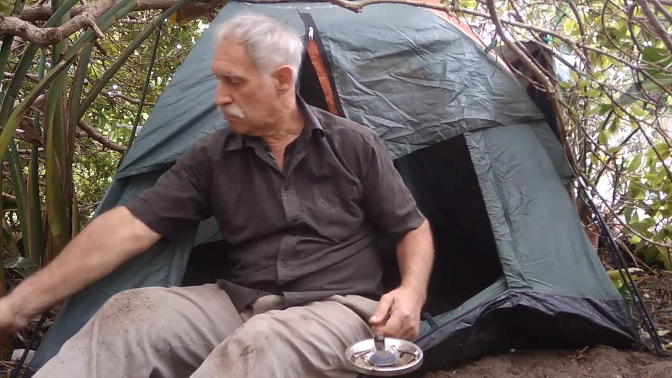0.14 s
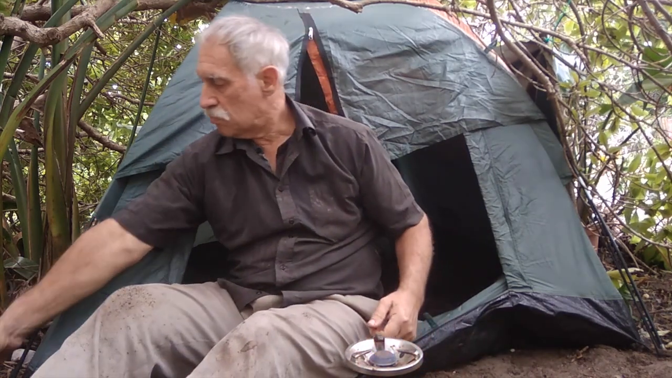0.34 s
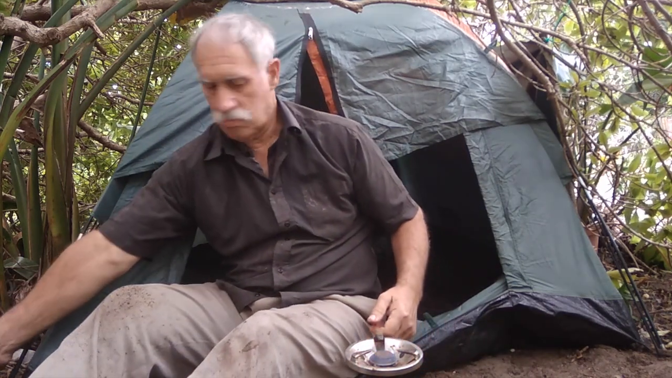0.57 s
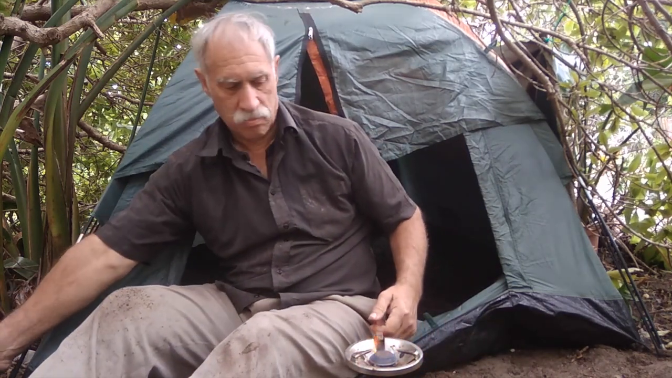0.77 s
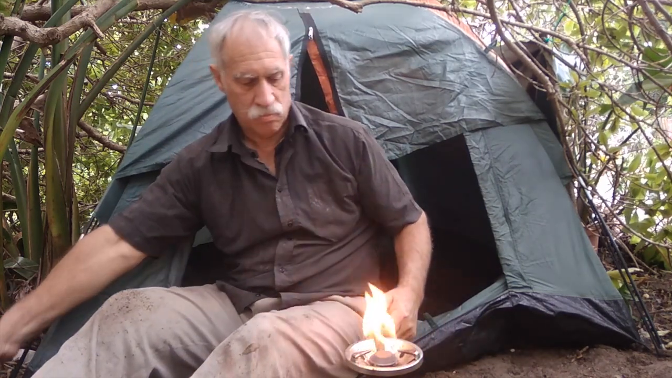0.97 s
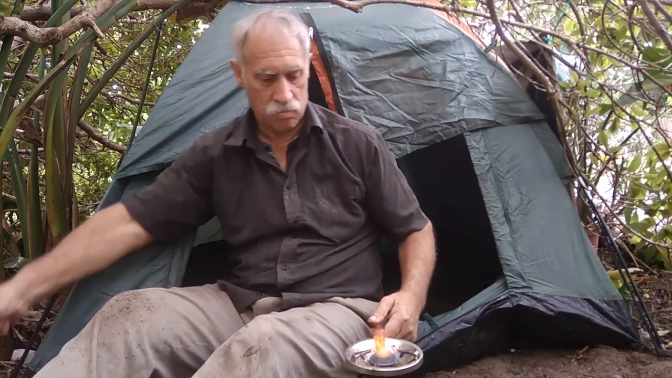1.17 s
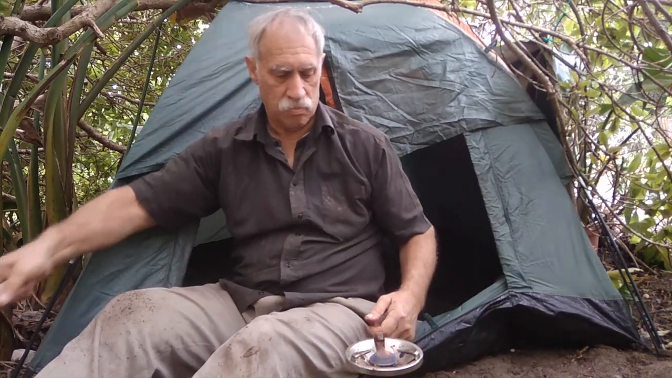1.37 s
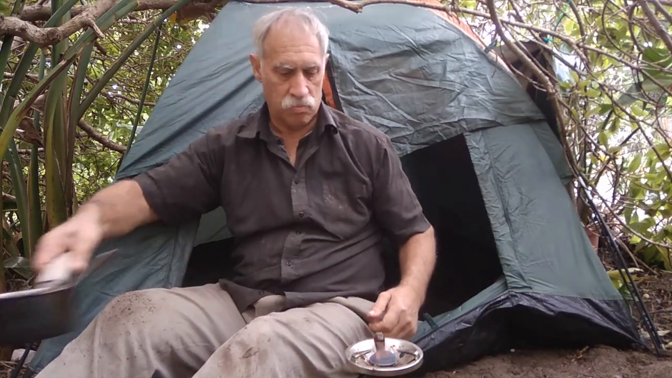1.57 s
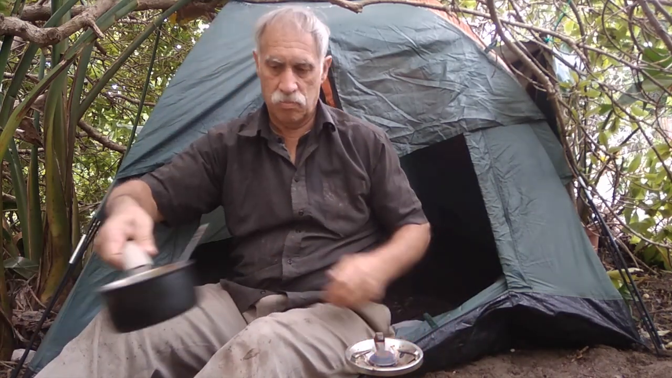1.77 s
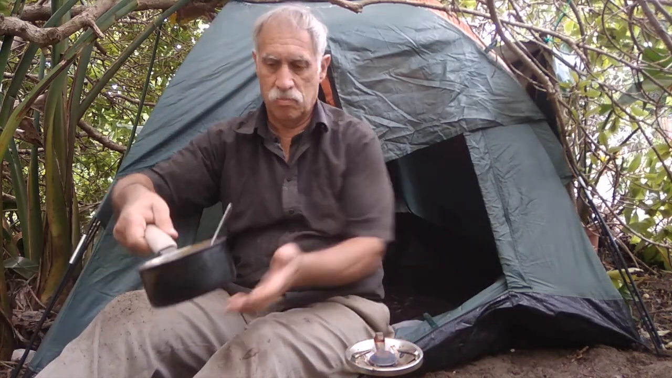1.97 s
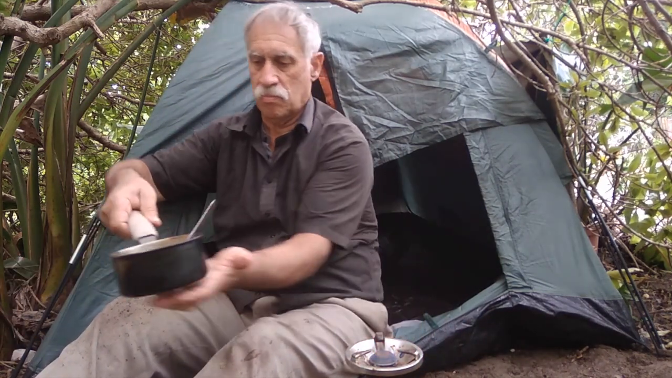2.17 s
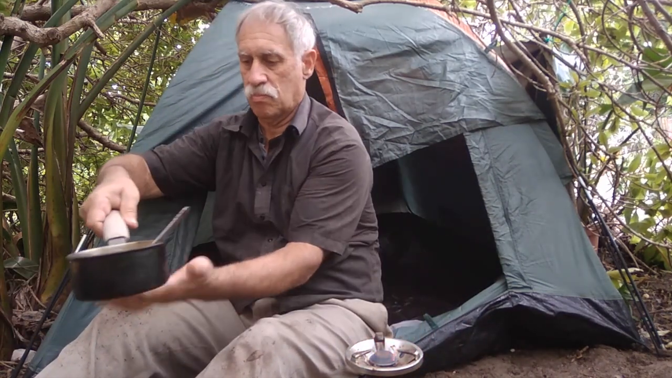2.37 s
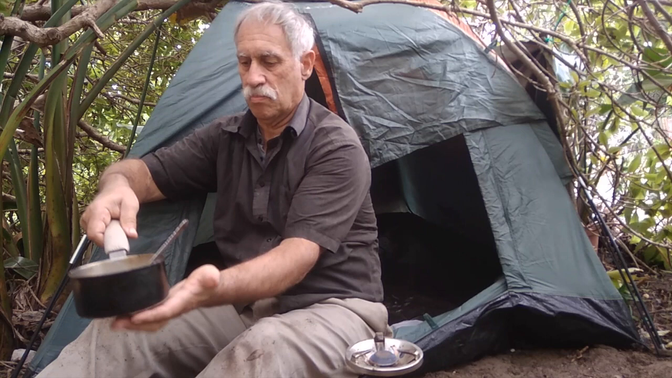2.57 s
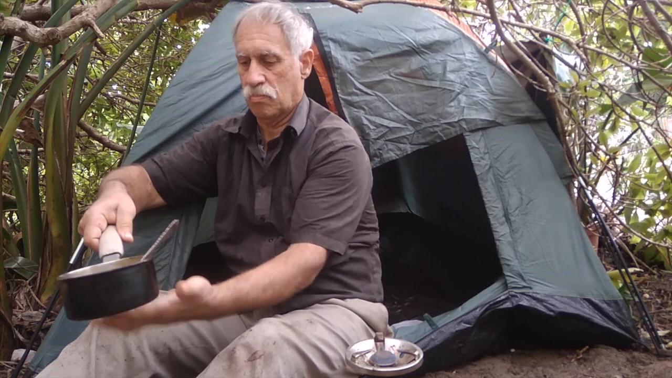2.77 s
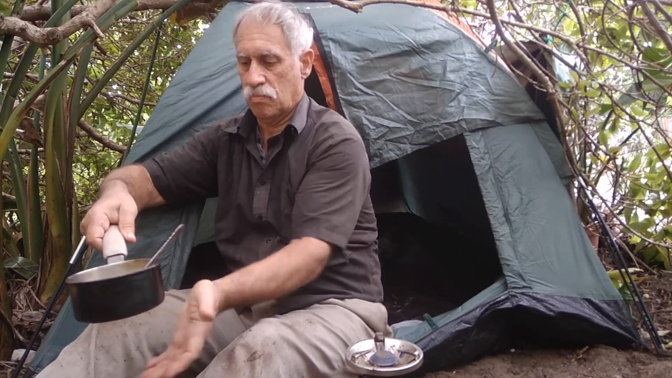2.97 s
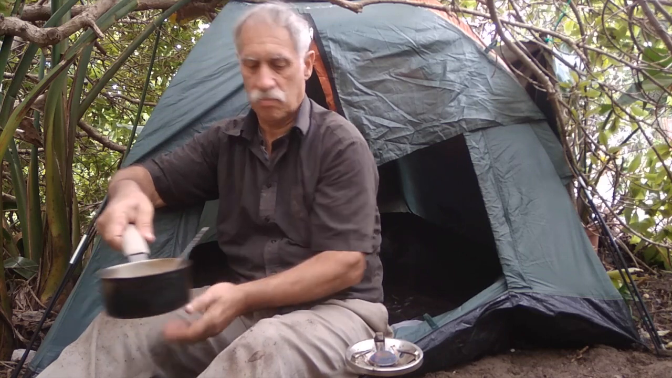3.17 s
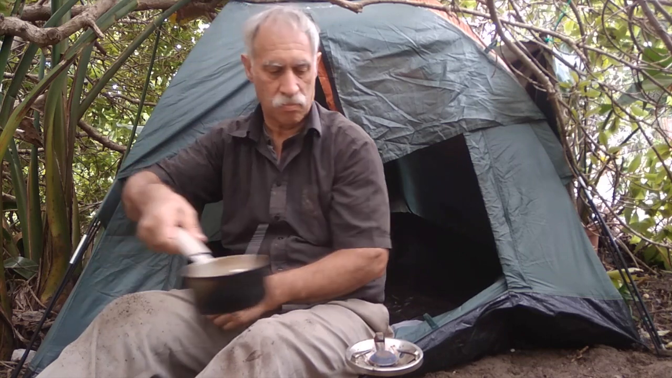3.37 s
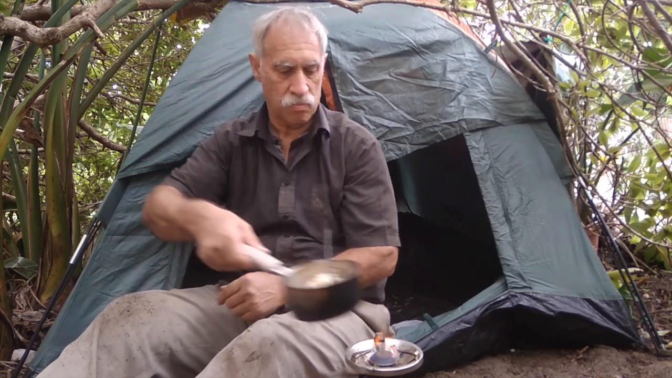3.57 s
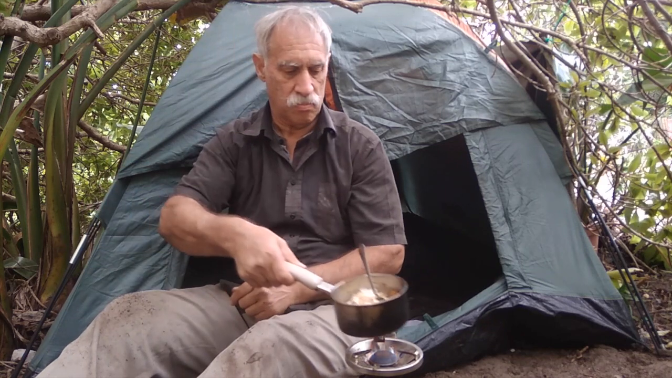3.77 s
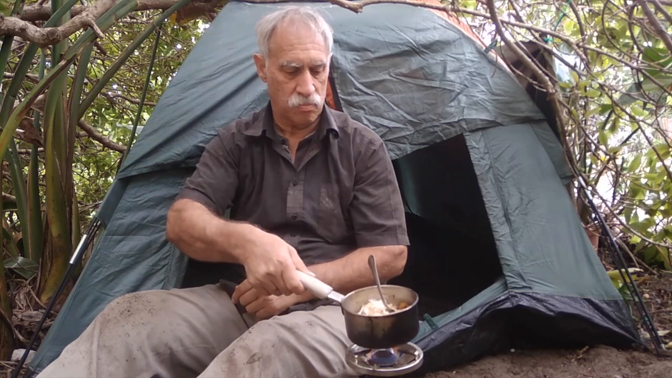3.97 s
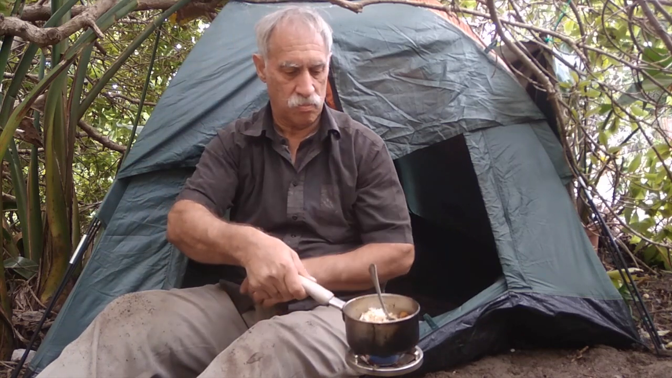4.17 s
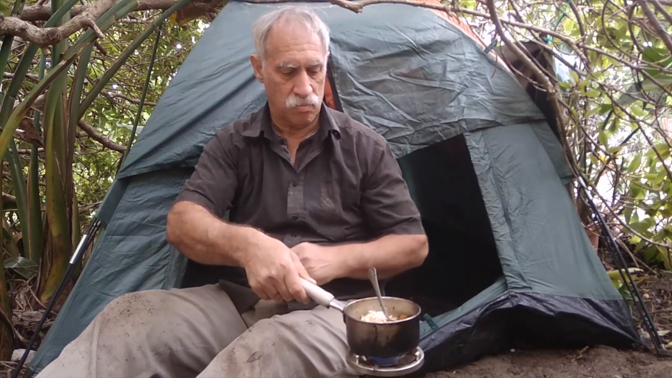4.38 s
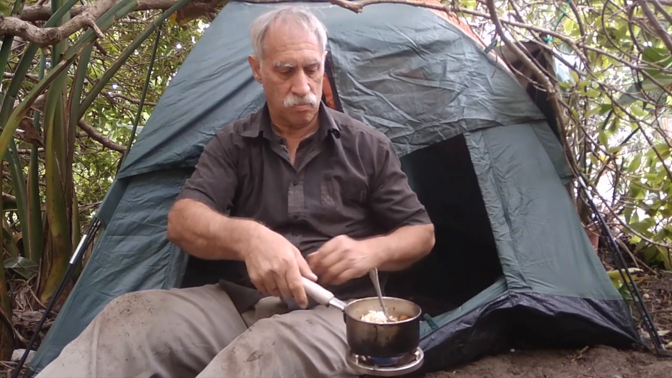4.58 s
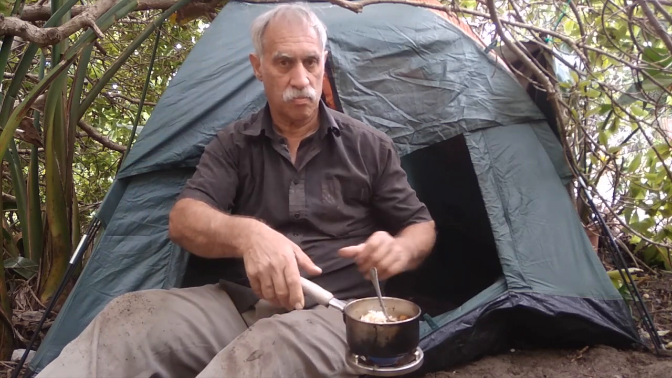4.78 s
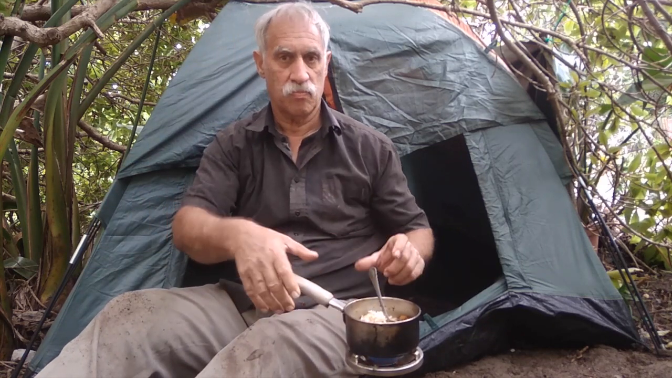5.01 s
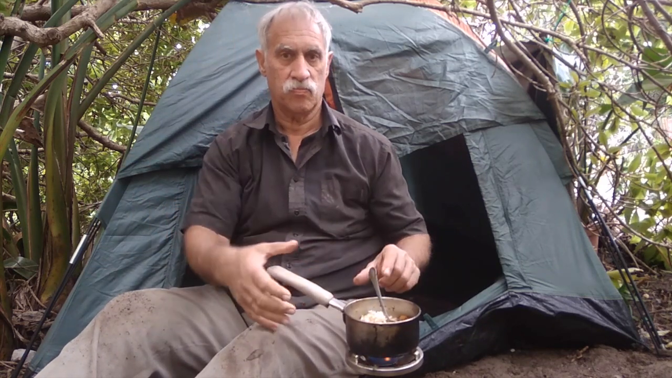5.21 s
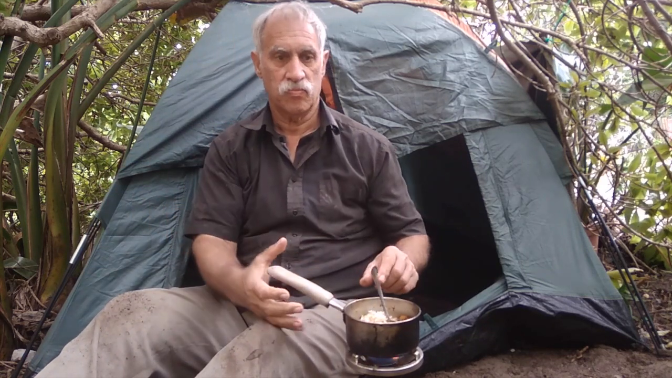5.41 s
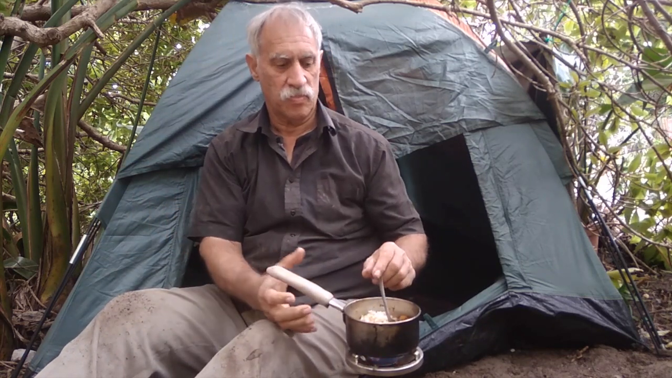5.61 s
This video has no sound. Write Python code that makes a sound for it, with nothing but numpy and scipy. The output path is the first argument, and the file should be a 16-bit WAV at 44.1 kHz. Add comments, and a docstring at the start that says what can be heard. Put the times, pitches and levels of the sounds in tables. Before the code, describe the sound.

Steady burner hiss over a low flame roar, with a brief flare, two scrapes of a palm under a pot, and a metallic clank.

```python
"""A small gas stove burns outdoors: shaped noise hisses in the burner jet and roars softly in the flame.
A bird, swept sines, chirps far off; the flame flares with thumps and puffs, sags once and catches again.
Sleeves rustle and a hand wipes twice under a metal pot, both as swells of grainy noise.
The pot is swung over the flame, which from then on shades the hiss, and is set down on the supports
with a clank of cracks, ringing modes and dense overtones."""
import sys
import numpy as np
from scipy import signal
from scipy.fft import rfft, irfft, next_fast_len
from scipy.io import wavfile
from scipy.ndimage import map_coordinates

SR = 44100
rng = np.random.default_rng(int(sys.argv[2]) if len(sys.argv) > 2 else 0)


def generate_wav(sig):
    """Save sig (samples, or channels by samples) to the path in sys.argv[1] as 16-bit PCM at SR."""
    pcm = np.round(np.clip(np.atleast_2d(sig).T, -1, 1) * 32767).astype(np.int16)
    wavfile.write(sys.argv[1], SR, pcm)


N = 249066
TIME = np.arange(N) / SR   # s
SIZE = next_fast_len(N, real=True)
HZ = np.maximum(np.arange(SIZE // 2 + 1) * SR / SIZE, 1)   # frequency of each spectrum bin

# the flame goes slack and catches on the burner again; each change of level takes SWITCH_S
SLACK_S, CATCH_S, SWITCH_S = 0.865, 0.996, 0.01


def from_db(db):
    """Decibels to gain."""
    return np.exp(np.asarray(db) * np.log(10) / 20)


def over_hz(points):
    """A table of (f/Hz, value) joined on a log-frequency axis."""
    hz, value = np.transpose(points)
    return np.interp(np.log(HZ), np.log(hz), value)


def above(hz):
    """Share of each frequency that lies above a steep crossover."""
    return 1 - 1 / (1 + (HZ / hz) ** 12)


def pan(db):
    """Left and right gains for a level difference; positive leans left."""
    return from_db(np.array([[0.5], [-0.5]]) * db)


def ramp(start_s, length_s):
    """A straight rise from 0 to 1."""
    return np.clip((TIME - start_s) / length_s, 0, 1)


def envelope(strokes):
    """Summed gain of bell-shaped swells, each with its own rise and fall."""
    gain = 0
    for s, db, rise_s, fall_s in strokes:
        spread_s = np.where(TIME < s, rise_s, fall_s)
        gain = gain + from_db(db) * np.exp(-0.5 * ((TIME - s) / spread_s) ** 2)
    return gain


def drift(rate_hz, order=16):
    """Slow chance of spread about 1: low-passed noise drawn on a grid of every 16th sample."""
    count = N // order + 2
    hz = np.arange(count // 2 + 1) * SR / (order * count)
    slow = irfft(rfft(rng.standard_normal(count)) / (1 + (hz / rate_hz) ** 2), count)
    return np.interp(np.arange(N) / order, np.arange(count), slow / slow.std())


def turbulence(right_lag_s=2.4e-5):
    """Spectrum of stereo noise at 0 dB per Hz; the right side hears it later and mostly less alike in the treble."""
    # likeness of the two sides: (f/Hz, left-right correlation)
    likeness = [(30, 0.81), (150, 0.92), (500, 0.98), (900, 0.11), (1500, 0.72), (2500, 0.1), (4500, 0.5),
                (6200, 0.52), (8000, 0.19), (9600, 0.23), (10900, 1), (12200, 0.18), (14000, 0.09)]
    mid, side = rfft(rng.standard_normal((2, SIZE))) * np.sqrt(SR) / 2
    alike = np.clip(over_hz(likeness), 0, 1)
    mid = mid * np.sqrt(1 + alike)
    side = side * np.sqrt(1 - alike)
    lag = np.exp(-2j * np.pi * HZ * right_lag_s)
    return np.array([mid + side, (mid - side) * lag])


def coloured(noise, gain):
    """A noise spectrum through a filter, as a waveform."""
    return irfft(noise * gain, SIZE)[:, :N]


def swells(strokes, colour, grain_db, grain_rate_hz, split_hz=4500):
    """Short swells of grainy noise; the grain is twice as rough, in dB, in the body as in the treble."""
    noise, upper = turbulence() * from_db(over_hz(colour)), above(split_hz)
    body = coloured(noise, 1 - upper) * from_db(grain_db * drift(grain_rate_hz))
    treble = coloured(noise, upper) * from_db(0.5 * grain_db * drift(grain_rate_hz))
    return (body + treble) * envelope(strokes) * pan(db=5.0)


def reflected(x, path_s, echo_db, sway_s):
    """Add a reflection; if its path sways slowly, a faint comb wanders through the sound."""
    lag = (path_s + sway_s * drift(rate_hz=1.0)) * SR   # samples
    echo = np.array([map_coordinates(side, [np.arange(N) - lag], order=3) for side in x])
    return (x + from_db(echo_db) * echo) / np.hypot(1, from_db(echo_db))


def pot_cover(open_share=0.15):
    """Share of the pot's cover, 0 to 1; there is a little even before the pot arrives."""
    # the pot moves over the burner, settles on it, and tips back a little when let go:
    # (t/s, length/s, added share of the cover)
    coverings = [(3.694, 0.24, .72), (4.305, 0.38, .21), (4.95, 0.81, -.14)]
    moved = sum(share * ramp(s, length_s) for s, length_s, share in coverings)
    return np.clip(open_share + moved, 0, 1)


def jet(cover, waver_db=0.87, waver_rate_hz=14, wander_db=1.08, wander_rate_hz=6.6):
    """Jet noise in the burner's resonances, each wandering alone; the pot shades most and lifts a few."""
    # broad resonances of the gas jet in the burner, before the hiss level:
    # (f/Hz, width/Hz, open level/dB per Hz, level under the pot/dB per Hz, left-right/dB)
    jet_bands = [(1441, 249, -85, -86.5, 8.5), (1720, 354, -91.5, -91.5, 6.5), (2760, 410, -99, -99.5, 3.5),
                 (3315, 1120, -93.5, -100, 8.5), (3495, 250, -100.5, -86.5, 6.5),
                 (4400, 190, -95.5, -98.5, 1), (4960, 150, -103, -122, 21.5), (5502, 240, -87.5, -97, 4),
                 (6074, 410, -84, -88, 6), (7020, 860, -87, -90, 5), (7675, 490, -83.5, -87.5, 7.5),
                 (8530, 820, -88.5, -92.5, 9), (9890, 1240, -89.5, -95.5, 12.5),
                 (10800, 560, -78.5, -81.5, 6), (11270, 364, -77, -89.5, 8.5),
                 (12300, 710, -92, -100, 19.5), (13700, 1000, -86, -100, 5), (14370, 540, -80, -87, 4.5),
                 (15450, 800, -107, -101, 1)]
    # course of the hiss: (t/s, level/dB)
    hiss_level = [(0, -0.75), (2.5, .5), (3.4, -1), (4.15, 3), (4.7, 1), (5.3, 3)]
    noises, out = [turbulence() for _ in range(3)], 0
    for k, (hz, width, open_db, covered_db, pan_db) in enumerate(jet_bands):
        bell = np.exp(-np.pi / 2 * np.minimum(((HZ - hz) / width) ** 2, 20))
        strength = (1 - cover) * from_db(open_db) + cover * from_db(covered_db)
        strength = strength * from_db(wander_db * drift(wander_rate_hz))
        out = out + coloured(noises[k % len(noises)], bell) * pan(pan_db) * strength
    hiss_s, hiss_db = np.transpose(hiss_level)
    return out * from_db(np.interp(TIME, hiss_s, hiss_db) + waver_db * drift(waver_rate_hz))


def flare():
    """Change in dB of the whole roar while the flame is slack."""
    slack_db = -8.5
    return slack_db * (ramp(SLACK_S - SWITCH_S / 2, SWITCH_S) - ramp(CATCH_S - SWITCH_S / 2, SWITCH_S))


def eddy_loss(return_s, loss_db_per_s=62, regrow_s=0.018):
    """Change in dB of eddies that die away in the slack flame and grow back from a given moment."""
    slack_for = np.clip(TIME, SLACK_S, return_s) - SLACK_S
    back_for = np.maximum(TIME - return_s, 0)
    return -loss_db_per_s * slack_for * np.exp(-back_for / regrow_s)


def resonances(bands):
    """Stereo gain of a set of steep-sided resonances, for the open burner and under the pot."""
    bare, covered = 0, 0
    for hz, width, open_db, covered_db, pan_db in bands:
        bell = 1 / (1 + 4 / 3 * ((HZ - hz) / width) ** 2)
        power = bell ** 3 * pan(pan_db) ** 2
        bare = bare + power * from_db(open_db) ** 2
        covered = covered + power * from_db(covered_db) ** 2
    return np.sqrt(bare), np.sqrt(covered)


def flame(cover, draught, roar_db=-0.01, flicker_db=0.82, flicker_rate_hz=35, fanning_db=-42):
    """Turbulent burning: a roar that draughts fan and that sags once in the flare, most in its upper ranges."""
    # broad and narrow resonances of the roar, with a faint hum at 133 Hz, before fanning and flicker:
    # (f/Hz, width/Hz, open level/dB per Hz, level under the pot/dB per Hz, left-right/dB)
    flame_bands = [(76, 85, -69, -68, 7.5), (133, 14, -63.5, -63, 7), (141, 78, -64, -63.6, 7),
                   (214, 118, -67.2, -67.3, 6.6), (425, 100, -76.5, -76, 4.4), (500, 105, -77, -75.3, 9),
                   (745, 46, -87, -98, 11), (860, 46, -86, -97, 13), (990, 56, -90.5, -110, 8),
                   (1123, 46, -94, -112, 7)]
    # eddies die away in the slack flame, and the finest come back last: (sound above f/Hz, return t/s)
    eddies = [(330, 0.999), (640, 1.036)]
    noise, (bare, covered) = turbulence(), resonances(flame_bands)
    edges = [np.ones_like(HZ)] + [above(hz) for hz, _ in eddies] + [np.zeros_like(HZ)]
    ranges = -np.diff(edges, axis=0)
    # each higher range adds its own loss to that of the ranges below
    sags_db = np.cumsum([flare()] + [eddy_loss(s) for _, s in eddies], axis=0)
    out = 0
    for part, sag_db in zip(ranges, sags_db):
        burning = (1 - cover) * coloured(noise, bare * part) + cover * coloured(noise, covered * part)
        out = out + from_db(sag_db) * burning
    fanned = 1 + draught / from_db(fanning_db)   # a draught at fanning_db (dB per Hz) doubles the roar
    return out * fanned * from_db(roar_db + flicker_db * drift(flicker_rate_hz))


def moving_air(calm_db=-79):
    """Strength of the draught at the flame: calm air (dB per Hz) and swelling gusts."""
    # gusts that shake the flame, most of them stirred by the arms and the pot:
    # (t/s, level/dB per Hz, rise/s, fall/s)
    gusts = [(1.93, -55, 0.027, 0.031), (2.2, -62, 0.15, 0.051), (2.92, -61.5, 0.14, 0.16),
             (3.2, -56.5, 0.075, 0.1), (3.82, -54, 0.14, 0.071), (5.45, -71, 0.66, 0.33)]
    return from_db(calm_db) + envelope(gusts)


def flutter(draught):
    """Moving air shakes the flame into a deep rumble."""
    # colour of the rumble, added to the draught's level: (f/Hz, level/dB)
    flutter_colour = [(15, -1), (35, -6), (60, -15), (100, -7), (200, -19), (500, -50.5)]
    return coloured(turbulence(), from_db(over_hz(flutter_colour))) * draught * pan(db=7.0)


def open_air():
    """Steady background air of the place, as shaped noise."""
    # spectrum of the air: (f/Hz, level/dB per Hz)
    air_colour = [(30, -80), (300, -87), (700, -109), (1100, -117), (2300, -115), (5000, -122),
                  (15000, -112)]
    return coloured(turbulence(), from_db(over_hz(air_colour)))


def bird(scatter_t60=0.23, scatter_db=-5, rasp_hz=62, rasp_rate_hz=220, echo_s=0.057, echo_db=-9):
    """Short, slightly raspy chirps far off; the trees return one echo and smear them."""
    # chirps before echo and panning: (t/s, level/dB, start f/Hz, end f/Hz, length/s)
    chirps = [(0.307, -48.5, 3640, 3535, 0.056), (0.458, -50.5, 3750, 3390, 0.064),
              (0.654, -56, 3680, 3760, 0.042), (0.785, -56.5, 3360, 3180, 0.026),
              (0.907, -58, 3200, 3130, 0.031), (2.413, -56, 3620, 3360, 0.071)]
    song, rasp = np.zeros(N), rasp_hz * drift(rasp_rate_hz)
    for s, db, start_hz, end_hz, length_s in chirps:
        along = ramp(s, length_s)
        pitch = start_hz + (end_hz - start_hz) * along + rasp
        swell = np.sin(np.pi * np.sqrt(along))
        song += from_db(db) * swell * np.sin(2 * np.pi * np.cumsum(pitch) / SR)
    song = song + from_db(echo_db) * np.interp(TIME - echo_s, TIME, song)
    trees = rng.standard_normal((2, SR // 2)) * from_db(-60 * TIME[:SR // 2] / scatter_t60)
    trees /= np.linalg.norm(trees, axis=1, keepdims=True)
    smeared = signal.fftconvolve(song[None], trees)[:, :N]
    return (song + from_db(scatter_db) * smeared) * pan(db=4.0)


def thumps(half_length_cycles=0.61):
    """Each jolt of the flame gives one low swing of pressure."""
    # the flame catches or is buffeted with a soft thump; level scales the sine before its bell and panning:
    # (t/s, level/dB, f/Hz)
    jolts = [(.823, -30, 169), (0.858, -35, 103), (1.001, -36, 138), (1.027, -30, 171), (1.942, -36, 88),
             (3.122, -28, 139), (3.147, -32, 81), (3.79, -32, 49), (3.822, -28, 60)]
    out = 0
    for s, db, hz in jolts:
        cycles = (TIME - s) * hz
        bell = np.exp(-0.5 * (cycles / half_length_cycles) ** 2)
        out = out + from_db(db) * np.sin(2 * np.pi * cycles) * bell
    return out * pan(db=6.5)


def puffs():
    """The flame puffs as it flares and as it settles again: two swells of noise."""
    # the puffs, before their colour: (t/s, level/dB per Hz, rise/s, fall/s)
    puff_strokes = [(.828, -92, 0.029, 0.061), (1.045, -96.5, 0.011, 0.037)]
    # colour of a puff: (f/Hz, level/dB)
    puff_colour = [(300, -11), (900, 4), (1500, -5), (2500, 1), (3500, 0), (4800, -6), (8000, 2),
                   (15500, -3)]
    return swells(puff_strokes, puff_colour, grain_db=0.5, grain_rate_hz=46)


def sleeves():
    """Cloth rustles as the arms move: soft swells of grainy noise."""
    # the rustles, before their colour: (t/s, level/dB per Hz, rise/s, fall/s)
    rustle_strokes = [(2.04, -96.5, 0.086, 0.099), (3.13, -94, .02, 0.11), (3.762, -90.5, 0.032, 0.12),
                      (4.92, -96.5, 0.11, 0.26), (5.48, -100, 0.097, 0.21)]
    # colour of the cloth: (f/Hz, level/dB)
    rustle_colour = [(300, 6), (900, -16), (1500, 4), (2400, 3.5), (4000, -3.5), (5000, -23), (6000, -28),
                     (8000, 4), (11000, -22), (15500, -31)]
    return swells(rustle_strokes, rustle_colour, grain_db=1.5, grain_rate_hz=90)


def palm():
    """A palm wipes the underside of the pot; the skin catches and slips on the metal, and snags."""
    # two wipes of the palm under the pot, each swelling and fading, before colour:
    # (t/s, level/dB per Hz, rise/s, fall/s)
    wipe_strokes = [(2.297, -83, 0.039, 0.04), (2.697, -82, 0.04, 0.039)]
    # colour of the wiping: (f/Hz, level/dB)
    wipe_colour = [(300, -20), (900, -6), (1500, -3), (2200, -3), (3500, -6.5), (4800, -7), (6000, -12),
                   (8000, 1), (11000, 3.5), (13000, 4.5), (15500, -2)]
    # the skin snags on the metal during a wipe, before colour: (t/s, level/dB per Hz, rise/s, fall/s)
    snag_strokes = [(2.278, -84, 0.0022, 0.0033), (2.315, -82, 0.0086, 0.003),
                    (2.331, -82.5, 0.0047, 0.0097), (2.689, -92, .003, .003), (2.727, -81, .003, 0.0045)]
    # colour of a snag: (f/Hz, level/dB)
    snag_colour = [(400, -15), (1200, -6), (2000, 2), (3300, -9), (5000, -11), (8000, -5), (15500, -8)]
    wiping = swells(wipe_strokes, wipe_colour, grain_db=2.5, grain_rate_hz=170)
    return wiping + swells(snag_strokes, snag_colour, grain_db=-1.0, grain_rate_hz=400)


def pot(crack_db=-55.0, crack_t60=0.01, tail_db=-73, tail_t60=0.1, ring_db=-5, scatter_db=1.0, press_s=0.00027):
    """The full pot lands and rattles: each contact gives a crack, brief modes and a tail of dense overtones."""
    # the pot meets the supports; a harder contact has a higher cut-off:
    # (t/s, relative level/dB, cut-off f/Hz)
    contacts = [(4.2178, -8, 900), (4.2226, 3, 560), (4.2245, 3.5, 480), (4.2309, 9, 880),
                (4.2314, -28, 11000), (4.2347, 1, 13200), (4.2355, -12.5, 12900), (4.2614, -8.5, 13000),
                (4.2628, -13, 12000), (4.2698, -20, 10000), (4.2775, -15, 9000)]
    # modes of pot and supports: (f/Hz, relative level/dB, t60/s)
    pot_modes = [(333, -35.5, 0.022), (555, -37, 0.021), (1470, -27, 0.027), (2330, -40, .05),
                 (2690, -35, 0.034), (3400, -30.5, 0.034), (5680, -39, 0.05), (6150, -24, 0.03),
                 (9770, -8, 0.0075), (11400, -9, 0.0064), (13140, -40, .07), (13700, -39, .07),
                 (14420, -36, .08), (855, -42, 0.06), (991, -39.5, 0.055), (1124, -39, 0.095),
                 (4420, -52, 0.14), (6001, -35, 0.06), (6670, -42, .06), (7881, -43, 0.07),
                 (8996, -34, 0.095), (9445, -37, .1), (9560, -34, .09), (9596, -29.5, 0.11),
                 (9830, -32, .07), (9970, -32, 0.07), (10280, -37, .08), (11290, -37, .06),
                 (11512, -32, 0.09), (11555, -34, .09)]
    # colour of a contact's first sharp crack: (f/Hz, relative level/dB)
    crack_colour = [(500, -9), (1300, -8), (3300, -10), (4800, -24), (6000, 5), (7800, -5), (9700, 4),
                    (11300, 3), (13000, -7), (15500, -7)]
    # colour of the dense overtones: (f/Hz, relative level/dB)
    clatter_colour = [(500, -14), (1300, 5), (2200, -12), (3300, -2), (4800, -17), (6000, 10.5), (7800, -5),
                      (9800, 10), (11300, -1), (13000, 8.5), (15500, 12)]
    t = TIME[:SR // 2]
    fade_db = -60 * t   # divided by a t60 below
    ringing = np.array([from_db(db + ring_db + fade_db / t60) * np.sin(2 * np.pi * hz * t) * (-1) ** k
                        for k, (hz, db, t60) in enumerate(pot_modes)])
    crack = coloured(turbulence(), from_db(over_hz(crack_colour)))
    overtones = coloured(turbulence(), from_db(over_hz(clatter_colour)))
    out = np.zeros((2, N))
    for k, (s, db, contact_hz) in enumerate(contacts):
        fresh = slice(k * len(t), (k + 1) * len(t))   # its own stretch of noise
        start = round(s * SR)
        blow = from_db(scatter_db * rng.standard_normal((2, len(pot_modes)))) @ ringing
        blow += from_db(crack_db + fade_db / crack_t60) * crack[:, fresh] * pan(db=-5.0)
        blow += from_db(tail_db + fade_db / tail_t60) * overtones[:, fresh]
        blow *= 1 - np.exp(-t / press_s)   # the force builds up as the metal gives
        softness = signal.butter(2, contact_hz, fs=SR, output="sos")   # a soft contact is dull
        out[:, start:start + len(t)] += from_db(db) * signal.sosfilt(softness, blow)
    return out * pan(db=7.0)


def scene():
    """Stove, bird and handling, all leaning to the left, in the open air."""
    cover, draught = pot_cover(), moving_air()
    hiss = reflected(jet(cover), path_s=0.0047, echo_db=-10.0, sway_s=0.000136)   # off the moving cook
    hiss = reflected(hiss, path_s=0.0084, echo_db=-14.0, sway_s=0)   # off the tent
    fire = flame(cover, draught) + flutter(draught) + thumps() + puffs()
    handling = sleeves() + palm() + pot()
    return hiss + fire + open_air() + bird() + handling


def record(dry, cutoff_hz=15900):
    """The top is cut steeply by an elliptic low-pass."""
    return signal.sosfilt(signal.ellip(12, 0.1, 80, cutoff_hz, fs=SR, output="sos"), dry)


dry = scene()
out = record(dry)
generate_wav(out)
```